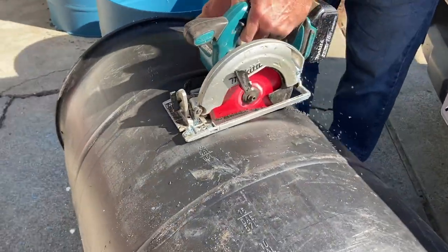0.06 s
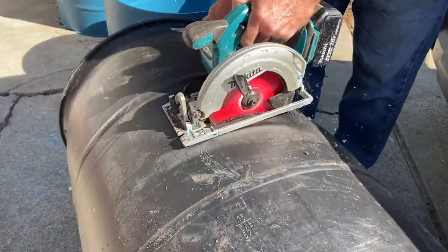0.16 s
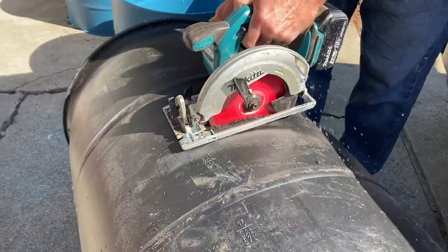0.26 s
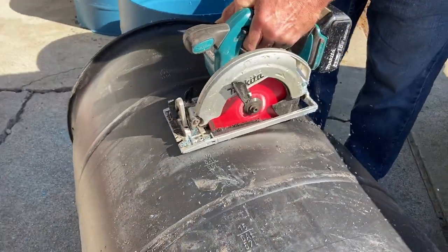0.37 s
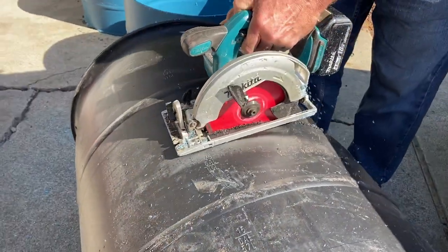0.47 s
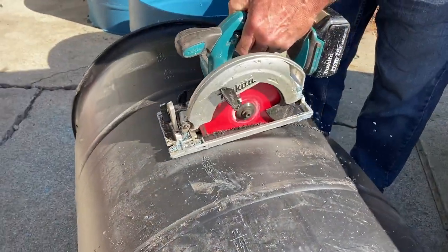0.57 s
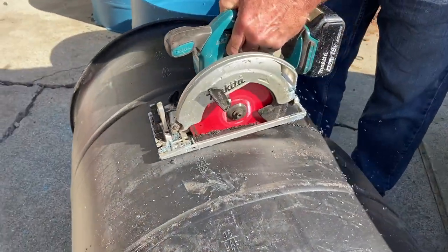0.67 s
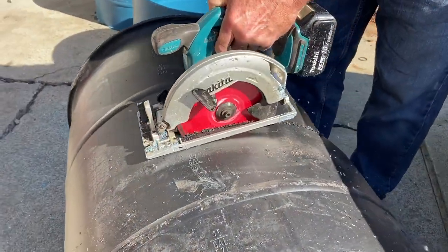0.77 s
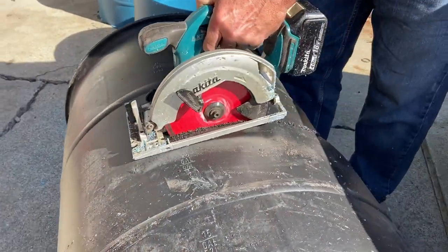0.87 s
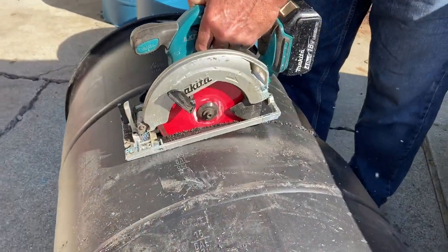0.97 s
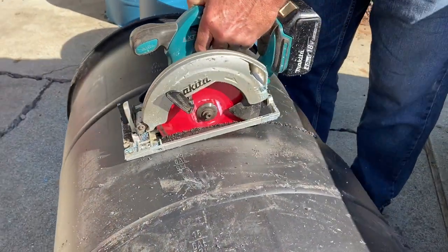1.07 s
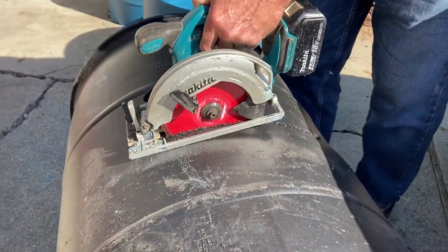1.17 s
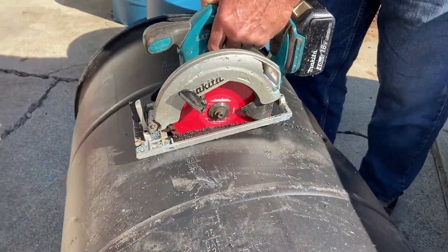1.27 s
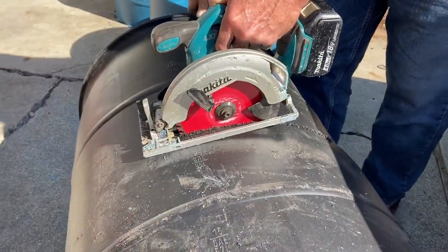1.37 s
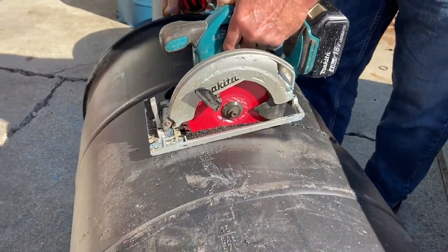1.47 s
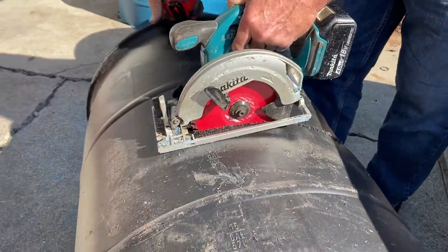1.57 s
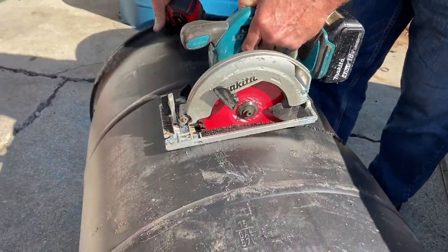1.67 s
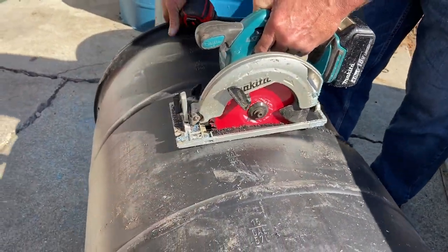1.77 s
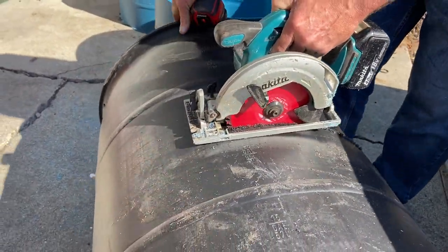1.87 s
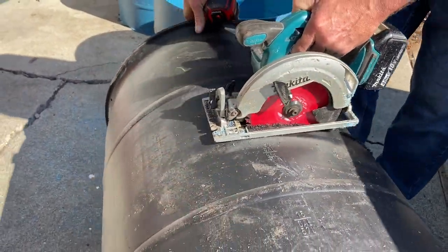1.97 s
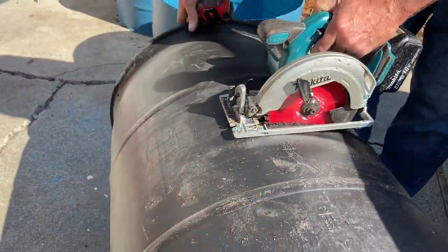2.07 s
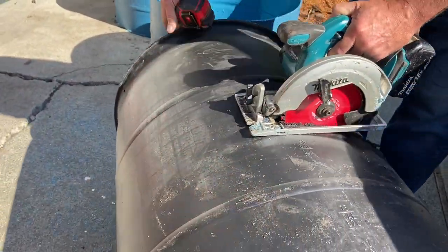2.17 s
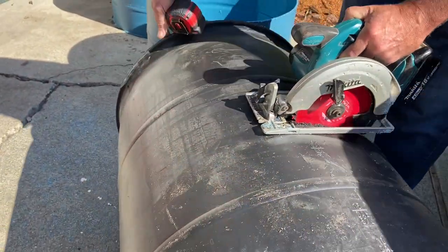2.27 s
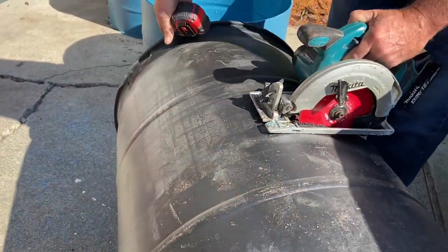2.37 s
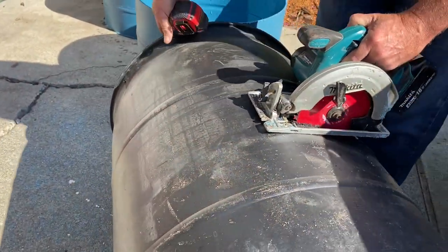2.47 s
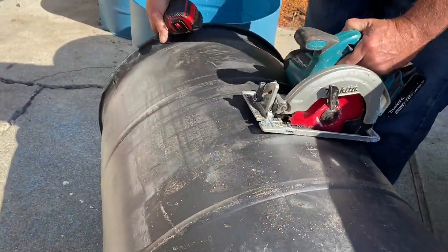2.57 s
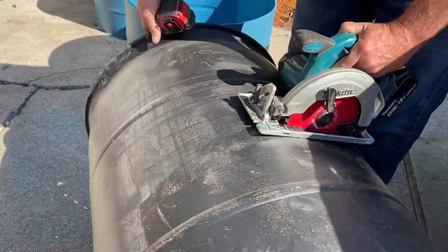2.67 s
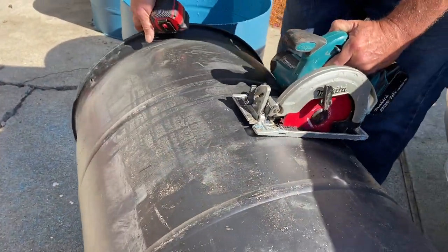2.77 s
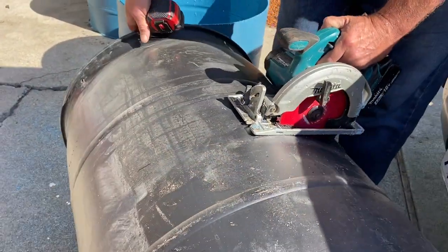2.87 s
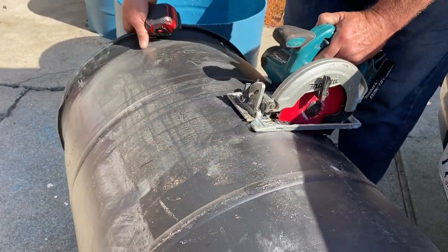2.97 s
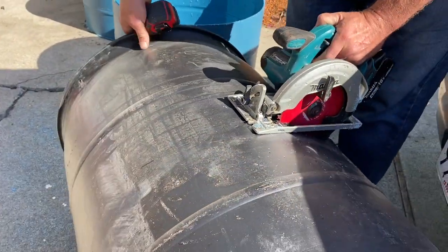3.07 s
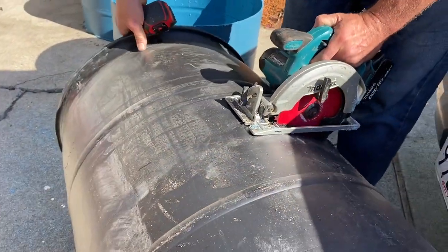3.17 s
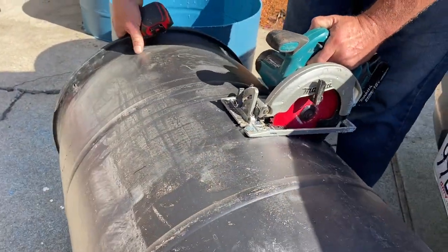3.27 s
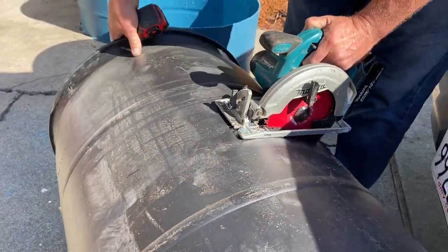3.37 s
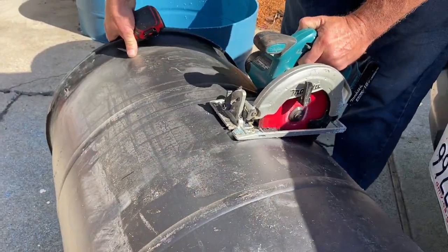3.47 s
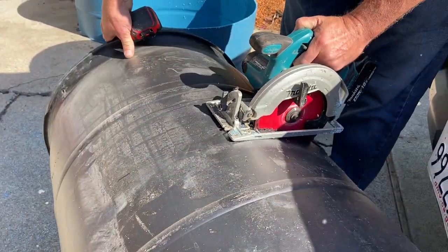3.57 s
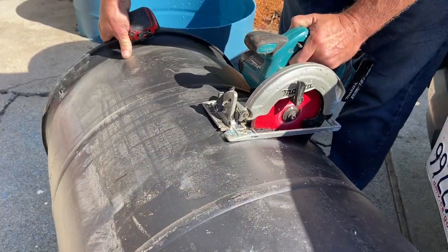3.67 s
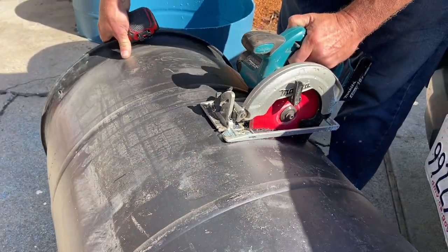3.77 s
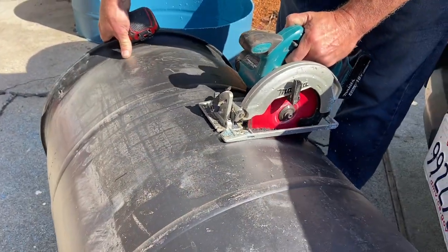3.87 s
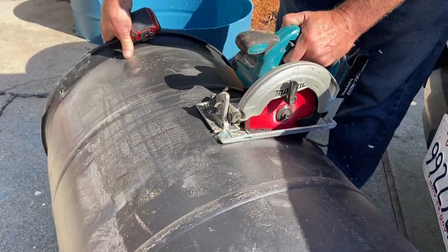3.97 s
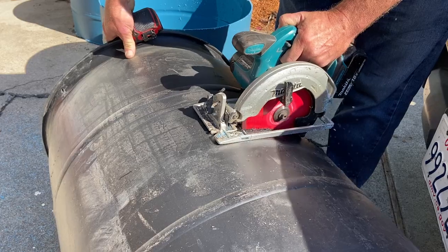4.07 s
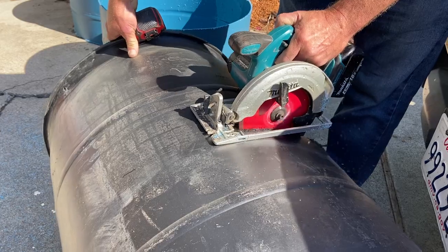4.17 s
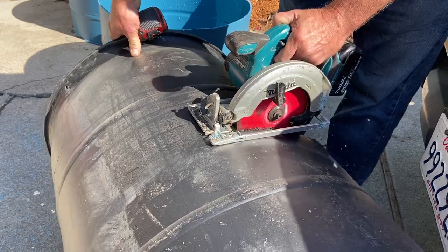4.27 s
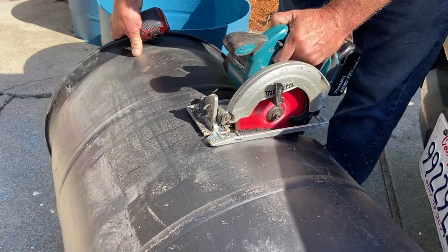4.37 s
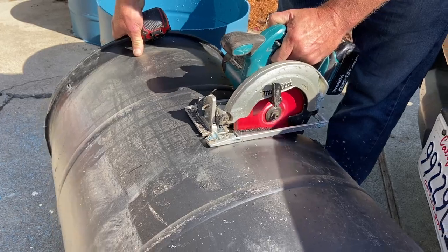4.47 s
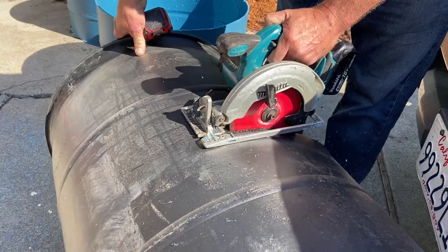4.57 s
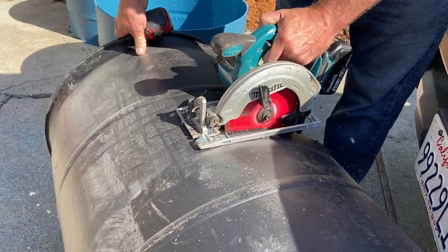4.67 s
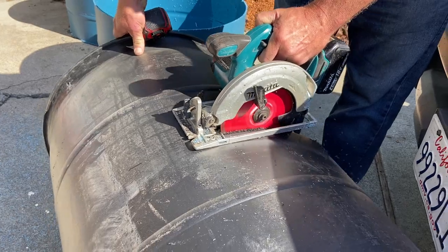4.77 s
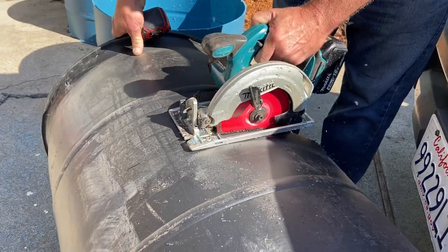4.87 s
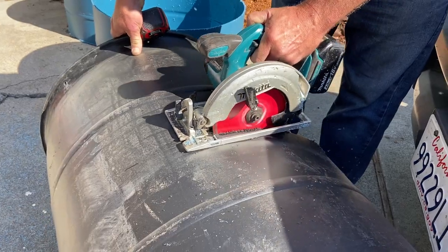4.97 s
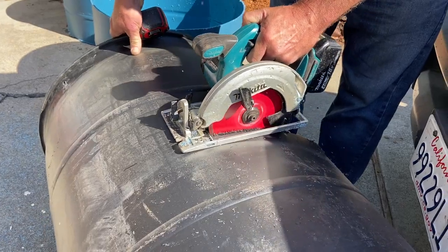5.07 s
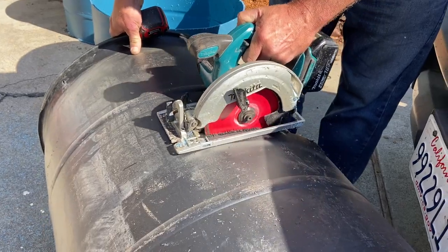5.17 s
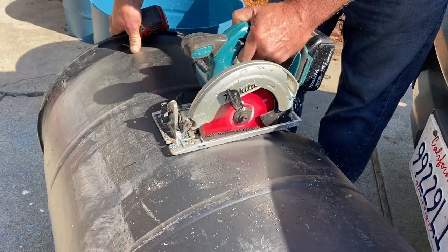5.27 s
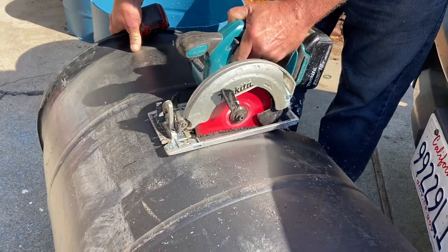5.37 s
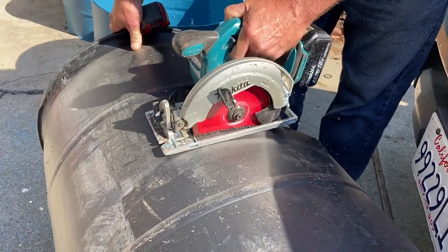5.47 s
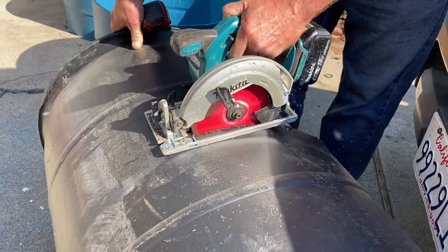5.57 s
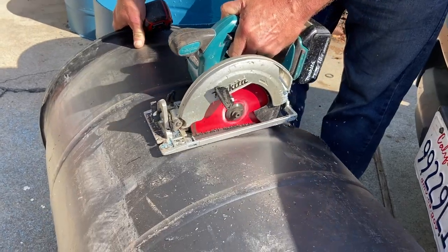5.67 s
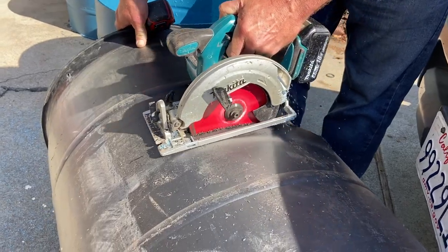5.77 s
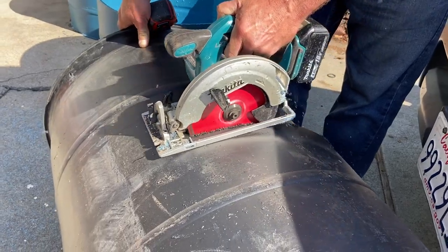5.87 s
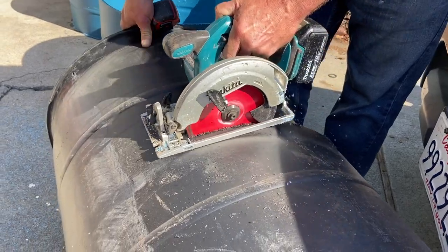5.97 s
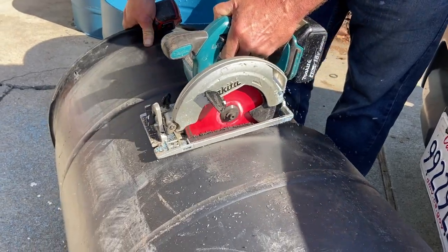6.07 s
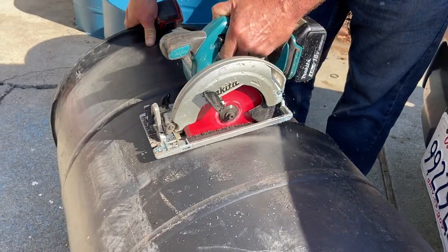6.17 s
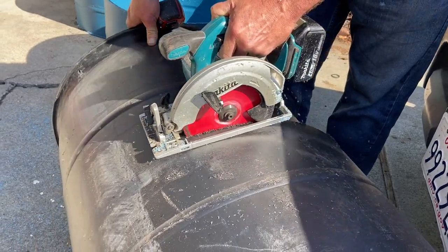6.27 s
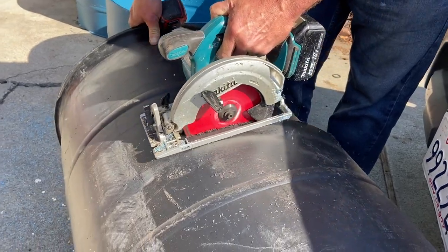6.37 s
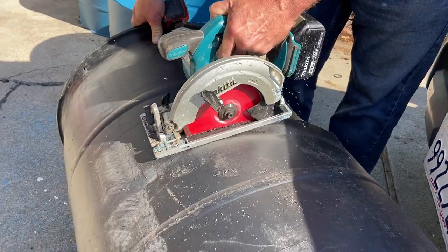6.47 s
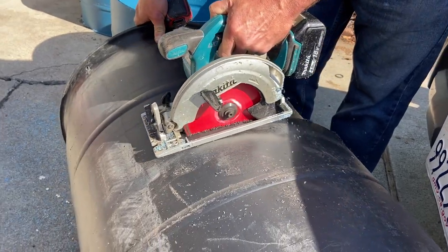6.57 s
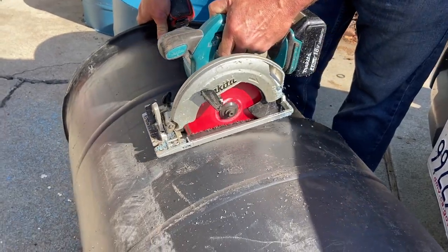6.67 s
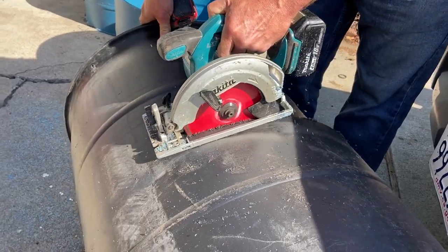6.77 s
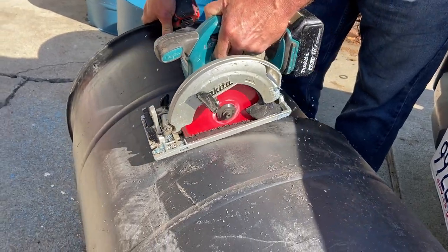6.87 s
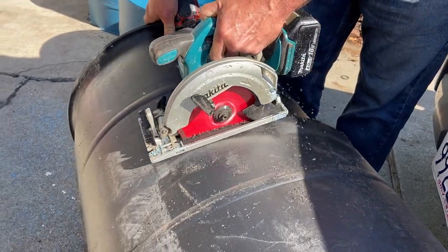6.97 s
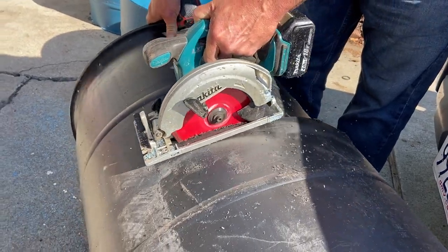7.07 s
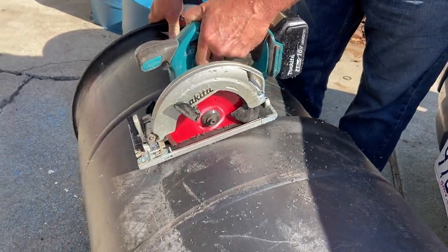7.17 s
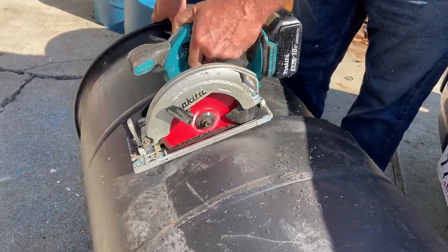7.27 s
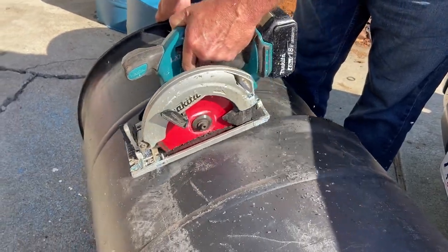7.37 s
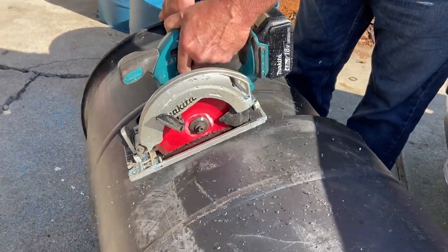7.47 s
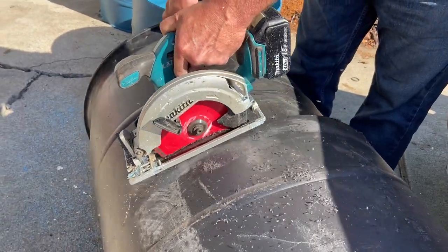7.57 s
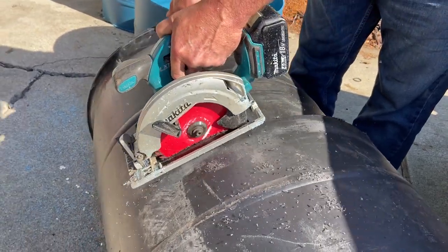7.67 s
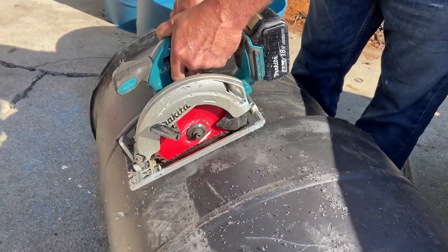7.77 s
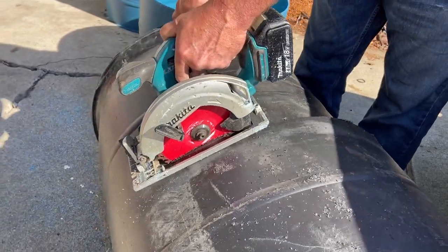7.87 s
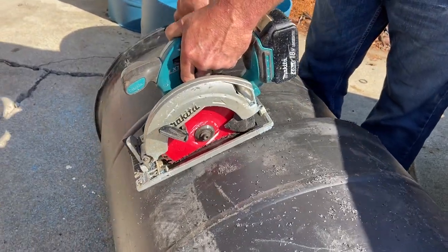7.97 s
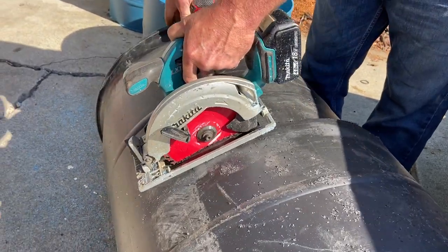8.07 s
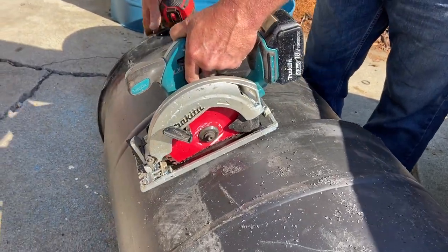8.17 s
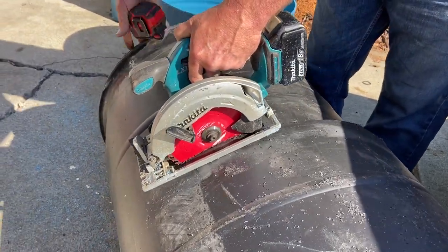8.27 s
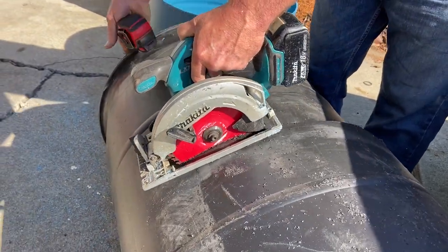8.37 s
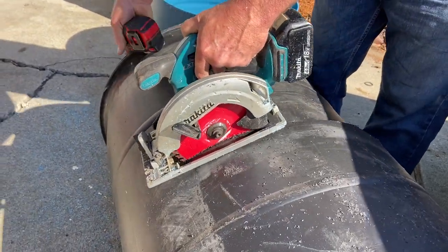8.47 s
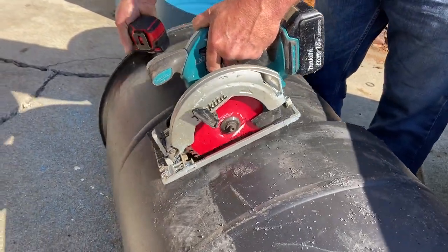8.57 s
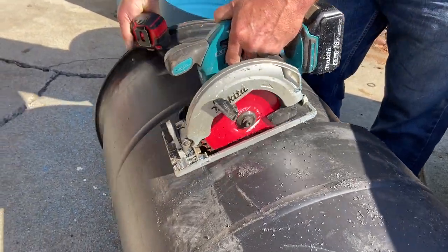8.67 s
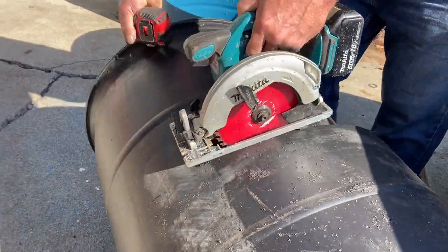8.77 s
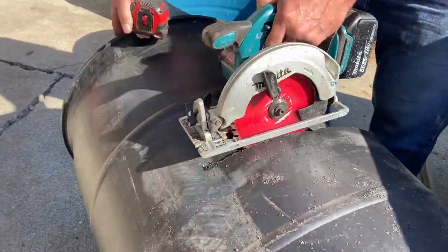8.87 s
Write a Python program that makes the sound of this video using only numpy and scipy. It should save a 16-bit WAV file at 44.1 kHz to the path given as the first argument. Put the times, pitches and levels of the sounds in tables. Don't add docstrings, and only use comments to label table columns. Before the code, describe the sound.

Loud gritty circular saw cutting into a plastic barrel, coasting to a stop, quiet handling, then a second longer cut that chatters to an abrupt stall.

```python
import sys
import numpy as np
from scipy import signal
from scipy.fft import rfft, irfft, next_fast_len
from scipy.io import wavfile

SR = 44100
rng = np.random.default_rng(int(sys.argv[2]) if len(sys.argv) > 2 else 0)


def materialize(psi):
    bounded = np.clip(np.atleast_2d(psi).T, -1, 1)
    quanta = np.round(bounded * 32767).astype(np.int16)
    wavfile.write(sys.argv[1], SR, quanta)


def linear_from_db(decibels):
    return 10 ** (np.asarray(decibels, float) / 20)


N = 393460
PADDED = next_fast_len(N + 4096)
TEETH = 40
FULL_SPEED_TEETH_PER_S = 1860
TRIGGER_S = 3.45


def rms_one(x):
    return x / np.sqrt(np.mean(x ** 2) + 1e-20)


def in_time(rows):
    s, *columns = np.transpose(rows)
    t = np.arange(N) / SR
    return [np.interp(t, s, c) for c in columns]


def coloured(x, points):
    hz, db = np.transpose(points)
    grid_hz = np.arange(PADDED // 2 + 1) * SR / PADDED + 1
    gain = linear_from_db(np.interp(np.log(grid_hz), np.log(hz), db))
    return irfft(rfft(x, PADDED) * gain, PADDED)[:N]


def drift(rate_hz):
    r = np.exp(-80 * np.pi * rate_hz / SR)
    noise = rng.standard_normal(N // 40 + 2002)
    slow = rms_one(signal.lfilter([1], [1, -2 * r, r * r], noise)[2000:])
    return np.interp(np.arange(N) / 40, np.arange(len(slow)), slow)


def resonance(x, hz, width_hz):
    r = np.exp(-np.pi * width_hz / SR)
    poles = [1, -2 * r * np.cos(2 * np.pi * hz / SR), r * r]
    return signal.lfilter([(1 - r * r) / 2, 0, (r * r - 1) / 2], poles, x)


def strike(times_s, peaks_db, modes, spread_db):
    at = (np.array(times_s) * SR).astype(int)
    out = np.zeros(N)
    chance = rng.standard_normal((len(at), len(modes)))
    for k, (hz, level_db, t60_s) in enumerate(modes):
        clicks = np.full(N, 1e-18)
        clicks[at] = linear_from_db(np.array(peaks_db) + level_db + spread_db * chance[:, k])
        r = linear_from_db(-60 / (t60_s * SR))
        w = 2 * np.pi * hz / SR
        out += signal.lfilter([0, np.sin(w)], [1, -2 * r * np.cos(w), r * r], clicks)
    return out


def grains(per_s, spread_db):
    sizes = linear_from_db(spread_db * np.minimum(rng.exponential(1, N), 5)) * rng.choice([-1, 1], N)
    return rms_one(sizes * (rng.random(N) < per_s / SR))


def held(starts_s, lengths_s, levels_db, rise_db_per_s, fall_db_per_s):
    t = np.arange(0, N + 32, 32) / SR
    early_s = (starts_s[:, None] - t).clip(0)
    late_s = (t - (starts_s + lengths_s)[:, None]).clip(0)
    db = np.max(levels_db[:, None] - rise_db_per_s * early_s - fall_db_per_s * late_s, axis=0)
    return linear_from_db(np.interp(np.arange(N) / SR, t, db))


def swells(rows, flutter_db, wander_rad):
    out = np.zeros(N)
    flutter = linear_from_db(flutter_db * drift(14))
    slip = wander_rad * drift(10)
    for s, length_s, hz, db in rows:
        span = np.arange(int((s - .04) * SR), int((s + length_s + .04) * SR))
        swell = np.sin(np.pi * (span - span[0]) / len(span))
        own = (span + rng.integers(N)) % N
        note = np.sin(2 * np.pi * hz * span / SR + slip[own])
        out[span.clip(0)] += linear_from_db(db) * swell * flutter[own] * note
    return out


# time in s, teeth passing per s.
SPEED = [
    [(0, 1854), (.25, 1870), (.55, 1898), (.66, 1897), (.706, 1779), (.842, 1290), (1.0, 840), (1.1, 615),
     (1.3, 330), (1.55, 90)],
    [(3.44, 90), (3.55, 700), (3.85, 1574), (4.09, 1650), (4.17, 1760), (4.45, 1764), (4.53, 1850),
     (4.72, 1850), (4.88, 1887), (5, 1888), (5.1, 1857), (5.3, 1860), (5.5, 1844), (5.75, 1852),
     (6.05, 1838), (6.2, 1870), (6.45, 1898), (6.85, 1815), (6.97, 1824), (7.12, 1812), (7.38, 1755),
     (7.41, 1662), (7.57, 1037), (7.65, 680), (7.72, 430), (7.79, 60)],
]
BOG_S, BOG_SINK_S, BOG_RECOVER_S, BOG_DEPTH_PER_S = 6.65, .19, .075, 530


def blade_speed():
    t = np.arange(N) / SR - BOG_S
    bog = np.where(t < 0, (1 + t / BOG_SINK_S).clip(0), np.exp(-t.clip(0) / BOG_RECOVER_S))
    return in_time(SPEED[0] + SPEED[1])[0] - BOG_DEPTH_PER_S * bog


def tooth_blows(passed, repeat_db, wobble_db):
    turn = passed / TEETH % 1
    order = np.arange(501)
    lean = 1 / (1 + order / 90) / (1 + (25 / (order + 1)) ** 2)
    size = np.sqrt(rng.exponential(1, (2, 501)))
    phase = np.exp(2j * np.pi * rng.random((2, 501)))
    signature = rms_one(irfft(lean * size * phase))
    place = (turn * 1000).astype(int)
    wear = 1.2 * drift(1.6)
    repeated = np.cos(wear) * signature[0, place] + np.sin(wear) * signature[1, place]
    runout = np.cos(2 * np.pi * turn) + .5 * np.cos(8 * np.pi * turn + 1) + .5 * np.cos(10 * np.pi * turn)
    chips = grains(7000, spread_db=0.5) * linear_from_db(wobble_db * runout + 1.7 * drift(29))
    share = linear_from_db(repeat_db)
    return (share * repeated + chips) / np.sqrt(1 + share ** 2)


def patchy(x, depth):
    centres_hz = np.geomspace(300, 11000, 9)
    return x + sum(depth * drift(2.3).clip(-2, 2) * resonance(x, hz, hz / 4) for hz in centres_hz)


# time in s, feed in dB, binding in the kerf in dB.
FIRST_CUT = [(0.0, -20.5, -7.5), (0.066, -21, -6.5), (0.12, -26.5, -3), (0.484, -22.5, -11.5),
             (0.838, -27.5, -1), (0.986, -33, 4), (1.03, -34, 3), (1.2, -42, 6), (1.37, -51, 10),
             (1.5, -77, 21)]
SECOND_CUT = [(3.51, -22.5, -8), (3.87, -18, -6.5), (4.87, -28.5, -5), (5.5, -20.5, -10), (5.73, -19, -10),
              (5.85, -21.5, -9.5), (6.12, -23, -12), (7.59, -26.5, -2.5), (7.66, -31, 2), (7.72, -37, 6.5)]
# time in s, width in s, feed change in dB, binding change in dB.
JOLTS = [(.25, .03, -1, -0.5), (.82, 0.055, 4.5, 0.5), (1.05, 0.034, 4, -2.5), (0.309, 0.048, 0, 4),
         (0.702, 0.017, 2, 0.5), (1.441, 0.032, 2, 2), (1.52, 0.017, 3.5, -2), (3.47, 0.023, 2.5, 20),
         (3.701, 0.049, -3.5, 1), (3.87, .02, 2.5, 0), (4.05, 0.045, 3, 0), (4.301, 0.041, 1.5, 4),
         (4.5, 0.12, 0.5, -4), (5.121, 0.056, -2, 2.5), (5.399, .06, 3, -0.5), (6.451, 0.026, 2.5, -0.5),
         (7.57, 0.013, -0.5, 6.5), (7.722, 0.024, -3.5, 8), (4.116, 0.013, -4, 3.5), (4.731, .03, -2, 3),
         (6.22, .03, 2, 1), (6.6, .03, -3.5, 2.5), (7.16, .03, -4.5, 3.5), (7.36, .03, 1, 3.5),
         (7.461, 0.021, -2, 1), (7.64, 0.016, 1.5, 1)]
SPIN_UP_DB_PER_S, STOP_DB_PER_S = 601.5, 207.5
ECHO_DB, ECHO_DB_PER_S = -18, 100


def effort():
    t = np.arange(N) / SR
    first, second = in_time(FIRST_CUT), in_time(SECOND_CUT)
    feed_db, bind_db = np.where(t < TRIGGER_S, first, second)
    after_s = (t - np.where(t < TRIGGER_S, FIRST_CUT[-1][0], SECOND_CUT[-1][0])).clip(0)
    feed_db += np.maximum(-STOP_DB_PER_S * after_s, ECHO_DB - ECHO_DB_PER_S * after_s)
    feed_db -= SPIN_UP_DB_PER_S * (SECOND_CUT[0][0] - t).clip(0) * (t >= TRIGGER_S)
    for s, width_s, jump_db, snag_db in JOLTS:
        bump = np.exp(-.5 * ((t - s) / width_s) ** 2)
        feed_db = feed_db + jump_db * bump
        bind_db = bind_db + snag_db * bump
    return feed_db, bind_db


STRONG_TURNS = [20, 26, 29, 32, 42, 43, 46, 49, 58, 61, 65, 68, 69, 70, 71, 74, 77, 79, 80, 82, 87, 90, 92,
                104, 136, 140, 145]
STRONG_DB = [-19.5, -22.5, -24, -23.5, -19.5, -15.5, -23.5, -25.5, -23, -24.5, -29, -22, -21.5, -17.5, -20,
             -20.5, -21, -23, -18, -27.5, -26.5, -24.5, -26.5, -23, -22, -23, -17]


def strong_turns(passed, level_db):
    turns = 2 * np.pi * passed / TEETH
    lines = np.zeros(N)
    for k, db in zip(STRONG_TURNS, STRONG_DB):
        lines += linear_from_db(db + 3.3 * drift(2.6)) * np.sin(k * turns + 2 * np.pi * rng.random())
    return linear_from_db(level_db) * lines


# start in s, length in s, level in dB.
WHINES = [(0, 0.076, -27), (.1, .6, -33.5), (0.77, 0.3, -26), (4.036, 0.059, -27.5), (4.177, 0.034, -24),
          (4.532, 0.14, -29), (4.7, 0.61, -37.5), (5.136, 0.43, -32.5), (5.75, 0.097, -43),
          (5.944, .12, -34), (6.5, 0.28, -36), (6.932, 0.12, -30.5), (7.21, .12, -38), (7.43, 0.086, -32.5),
          (7.605, 0.049, -30.5), (7.692, 0.054, -24.5)]
WHINE_RISE_DB_PER_S, WHINE_FALL_DB_PER_S = 156, 198.5
OVERTONE_TEETH_PER_S, FAINT_TEETH_PER_S = 450, 300
CHATTER_DB_PER_OCTAVE, CHATTER_RAD_PER_OCTAVE = 2.0, 1.3


def tooth_whine(per_s, passed, slowed_oct):
    stalling = slowed_oct.clip(0, 2) * (np.arange(N) / SR > TRIGGER_S)
    phase = 2 * np.pi * passed + .55 * drift(20) + CHATTER_RAD_PER_OCTAVE * stalling * drift(45)
    apart = np.exp(-per_s / OVERTONE_TEETH_PER_S) * (stalling > 0)
    tone = np.sin(phase) + (0.065 + 2 * apart) * np.sin(2 * phase) + 2 * apart ** 2 * np.sin(3 * phase)
    tone = tone / (1 + (FAINT_TEETH_PER_S / per_s) ** 3)
    tone = tone * (1 + 0.17 * np.cos(2 * np.pi * passed / TEETH))
    level = held(*np.transpose(WHINES), WHINE_RISE_DB_PER_S, WHINE_FALL_DB_PER_S)
    return level * linear_from_db(1.1 * drift(27) + CHATTER_DB_PER_OCTAVE * stalling * drift(28)) * tone


# frequency in Hz, level in dB per Hz.
CUT_COLOUR = [(40, -29), (150, -18.5), (330, -10), (600, -4), (1350, 1.5), (2400, -3), (3500, -0.5),
              (5300, -10), (6800, -4), (7800, -5.5), (10000, -6.5), (13500, -6), (15500, -3)]
# frequency in Hz, width in Hz, level in dB.
BLADE = [(233, 22, -12), (627, 4.3, -2), (1312, 24, -6.5), (1840, 3.7, -11), (2760, 3.7, -11.5),
         (3030, 3.7, -3.5), (3320, 90, -7.5), (3390, 22, -5), (3650, 21, -6), (4315, 38, 1),
         (6700, 56, -9.5), (6840, 74, 0)]
# time in s, repeated over loose part in dB.
EVENNESS = [(0, 1), (.3, 2), (.42, 5), (.66, 5), (.72, -7), (4.4, -7), (4.52, -1), (5.1, -1), (5.6, 1),
            (6.1, 1), (6.25, -4), (6.5, -8), (6.8, -8), (6.9, -1), (7.35, -2), (7.45, -8)]
# start in s, length in s, frequency in Hz, level in dB.
SINGS = [(0, .38, 423, -36), (0, .3, 931, -33), (.19, .3, 1134, -37.5), (7.25, .23, 380, -39.5),
         (.78, .15, 687, -36.5), (3.84, .3, 1384, -37), (3.85, .2, 1968, -33), (3.7, .58, 3690, -31),
         (4.1, .3, 1140, -33), (6.75, .8, 3130, -40), (4.65, .5, 410, -44), (4.63, .25, 560, -37.5),
         (4.93, .26, 514.3, -35), (5.56, .41, 695, -38), (6.88, .22, 2229, -40)]
BOOM_DB, BOOM_DB_PER_BIND_DB, BOOM_DB_PER_OCTAVE = -7.5, 0.92, 2.5
FLUTTER_DB_PER_OCTAVE = .8
TOP_DULL_DB_PER_S = 148


def saw():
    per_s = blade_speed()
    passed = np.cumsum(per_s) / SR
    slowed_oct = np.log2(FULL_SPEED_TEETH_PER_S / per_s)
    repeat_db, = in_time(EVENNESS)
    repeat_db = repeat_db - 12 * slowed_oct.clip(0, 2)
    blows = tooth_blows(passed, repeat_db - 3, wobble_db=0.5)
    plate = np.zeros(N)
    for k, (hz, width_hz, db) in enumerate(BLADE):
        plate += (-1) ** k * linear_from_db(db) * (1 + 0.36 * drift(2.0)) * resonance(blows, hz, width_hz)
    body = patchy(coloured(blows + linear_from_db(8.0) * plate, CUT_COLOUR), depth=0.18)

    low = signal.sosfiltfilt(signal.butter(2, 800, fs=SR, output="sos"), body)
    high = signal.sosfiltfilt(signal.butter(2, 2600, "high", fs=SR, output="sos"), body)
    top = signal.sosfiltfilt(signal.butter(2, 7500, "high", fs=SR, output="sos"), high)
    stopped_s = (np.arange(N) / SR - SECOND_CUT[-1][0]).clip(0)
    fading = (high - top * (1 - linear_from_db(-TOP_DULL_DB_PER_S * stopped_s))) / np.std(high)

    feed_db, bind_db = effort()
    bind_db = bind_db + FLUTTER_DB_PER_OCTAVE * slowed_oct.clip(0, 2) * drift(25)
    boom_db = feed_db + BOOM_DB + BOOM_DB_PER_BIND_DB * bind_db + BOOM_DB_PER_OCTAVE * slowed_oct
    boom = linear_from_db(boom_db - 1.5) * rms_one(low)
    bite = linear_from_db(feed_db + bind_db - 7.0) * rms_one(body - low - high)
    hiss = linear_from_db(feed_db + 2.5) * fading
    cut = boom + bite + hiss + strong_turns(passed, feed_db + repeat_db)
    singing = linear_from_db(1.2) * swells(SINGS, flutter_db=3.5, wander_rad=0.98)
    return cut + tooth_whine(per_s, passed, slowed_oct) + singing


# start in s, length in s, dull rub in dB, scrape in dB.
RUBS = [(1.55, 0.011, -62.5, -69), (1.65, .12, -76.5, -79.5), (1.944, .06, -76, -62),
        (2.091, 0.036, -53, -65), (2.2, 0.18, -68, -94), (2.55, 0.37, -55, -77), (3.001, 0.12, -49, -85.5),
        (3.284, .05, -60.5, -79), (3.43, 0.011, -82.5, -88.5), (7.94, .14, -84.5, -77.5),
        (8.199, .3, -86.5, -95.5), (8.598, .03, -55, -89), (8.679, .1, -56.5, -77),
        (8.842, 0.078, -46, -72)]
# frequency in Hz, level in dB per Hz.
RUB_COLOUR = [(90, -36.5), (130, 0), (220, 6), (400, 2.5), (750, -1.5), (1200, -13.5), (2500, -36.5),
              (5000, -43.5)]
# frequency in Hz, level in dB per Hz.
SCRAPE_COLOUR = [(800, 3), (1500, 2), (2200, -3), (3400, -8.5), (5000, -12.5), (8000, -18), (15500, -22)]
# start in s, length in s, level in dB.
THUMP = [(0, 1.1, -62.5), (1.353, 0.18, -53.5), (1.77, .13, -70), (2.086, .03, -54.5), (2.42, 0.044, -57.5),
         (2.548, .35, -59.5), (2.987, 0.096, -49), (3.112, 0.032, -54.5), (3.194, 0.18, -62.5),
         (3.481, 0.037, -34.5), (3.827, .7, -59), (4.586, .6, -52), (5.195, 1.3, -59), (6.903, .6, -60),
         (7.75, .05, -41), (8.05, 0.44, -79), (8.57, .35, -59)]
# frequency in Hz, level in dB per Hz.
THUMP_COLOUR = [(25, -60.5), (45, -23.5), (64, 3.5), (72, -8), (84, 5.5), (95, -11), (112, -10.5),
                (150, -8), (250, -54.5)]
# start in s, length in s, frequency in Hz, width in Hz, level in dB.
SQUEAKS = [(3.7, .074, 2550, 302, -71), (1.94, 0.033, 2250, 270, -56), (1.95, .04, 3330, 320, -56)]
RUB_RISE_DB_PER_S, SCRAPE_RISE_DB_PER_S, RUB_FALL_DB_PER_S = 400, 160.5, 204
THUMP_RISE_DB_PER_S, THUMP_FALL_DB_PER_S = 1200, 110.5


def handling():
    s, length_s, rub_db, scrape_db = np.transpose(RUBS)
    rub = held(s, length_s, rub_db, RUB_RISE_DB_PER_S, RUB_FALL_DB_PER_S)
    scrape = held(s, length_s, scrape_db, SCRAPE_RISE_DB_PER_S, RUB_FALL_DB_PER_S)
    dull = rms_one(coloured(grains(2500, spread_db=2.0), RUB_COLOUR)) * linear_from_db(1.0 * drift(39) - 8.0)
    fine = rms_one(coloured(grains(8000, spread_db=1.5), SCRAPE_COLOUR)) * linear_from_db(2.5 * drift(35))
    rattle = np.zeros(N)
    for start_s, long_s, hz, width_hz, db in SQUEAKS:
        event = np.array([[start_s], [long_s], [db]])
        rattle += held(*event, RUB_RISE_DB_PER_S, RUB_FALL_DB_PER_S) * resonance(fine, hz, width_hz)
    rocking = held(*np.transpose(THUMP), THUMP_RISE_DB_PER_S, THUMP_FALL_DB_PER_S)
    thump = rocking * rms_one(coloured(rng.standard_normal(N), THUMP_COLOUR))
    return rattle + rub * dull + scrape * fine + thump


# frequency in Hz, level in dB per Hz.
AIR = [(60, 11), (250, -9), (1000, -21.5), (4000, -34), (15000, -37)]
AIR_DB = -67


def air():
    return linear_from_db(AIR_DB) * rms_one(coloured(rng.standard_normal(N), AIR))


# time in s, peak in dB.
RINGS = [
    (1.5, -57),
    (2.15, -83),
    (7.79, -50),
]
# frequency in Hz, level in dB, t60 in s.
COAST_RING = [(215, -6, 1.2), (754, -18, .8), (1470, -11, .8), (2358, -19, 1.0), (3526, -11, 1.0)]
# frequency in Hz, level in dB, t60 in s.
NUDGE_RING = [(2358, -1.5, 0.76), (3540, -1, 0.97), (3800, -13, .4)]
# frequency in Hz, level in dB, t60 in s.
STALL_RING = [(215, 1, 1.3), (431, 2, .15), (651, -2, .26), (867, 0, .6), (1082, -14, .42), (1233, -4, .5),
              (1346, -21, .78), (1787, -26, .88), (2159, -21, .55), (2315, -16, .85)]


def rings():
    mode_sets = (COAST_RING, NUDGE_RING, STALL_RING)
    return sum(strike([s], [db], modes, spread_db=5.0) for (s, db), modes in zip(RINGS, mode_sets))


# time in s, peak in dB,
# brightness in dB, note of the spot in Hz.
KNOCKS = [(1.852, -73.5, -12, 990), (2.017, -43, -18, 620), (2.078, -49, -16.5, 607),
          (2.082, -44, -24.5, 160), (2.103, -45.5, -12.5, 660), (2.133, -52, -9, 900),
          (2.146, -52, -14, 700), (2.119, -48.5, -18.5, 710), (2.202, -58.5, -22, 750),
          (2.467, -67.5, -16, 476), (2.548, -52.5, -9, 670), (2.61, -51.5, -15.5, 487),
          (2.749, -62.5, -27, 565), (2.794, -50, -21.5, 377), (2.829, -54.5, -8, 710),
          (2.873, -54, -22, 369), (2.998, -47.5, -19.5, 646), (3.036, -39, -21, 670),
          (3.089, -39, -27, 300), (3.33, -57.5, -6, 1100), (3.45, -47, -5.5, 520),
          (3.456, -17.5, -20.5, 720), (7.571, -20.5, -24.5, 945), (7.606, -19, -24.5, 820),
          (7.636, -9, -24, 690), (7.669, -17, -23.5, 620), (7.688, -21.5, -23, 880),
          (7.716, -15, -24.5, 680), (8.097, -55.5, -34, 608), (8.103, -64, -35, 1050),
          (8.114, -58, -35, 700), (8.526, -62.5, -6.5, 1520), (8.609, -54.5, -14, 1272),
          (8.751, -57.5, -24, 638), (8.837, -53, -22.5, 315), (8.865, -45.5, -13.5, 510),
          (8.912, -57.5, -4.5, 612)]
# frequency in Hz, level in dB, t60 in s.
DRUM = [(107, -13.5, 0.1), (203.3, 2, 0.35), (338.4, 3.5, 0.078), (373, -7.5, 0.18)]


def knocks():
    s, peak_db, bright_db, note_hz = np.transpose(KNOCKS)
    at = (s * SR).astype(int)
    ticks = np.full(N, 1e-18)
    ticks[at] = linear_from_db(peak_db + bright_db + 4.0)
    fade = np.exp(-1 / (.004 * SR))
    grit = rms_one(coloured(rng.standard_normal(N), SCRAPE_COLOUR))
    out = signal.lfilter([1], [1, -fade], ticks) * grit
    t = np.arange(4000) / SR
    for start, db, hz in zip(at, peak_db, note_hz):
        pair = np.sin(2 * np.pi * hz * t) + 0.16 * np.sin(2 * np.pi * 0.92 * hz * t)
        note = linear_from_db(db - 3.0) * np.exp(-t / 0.0094) * (1 - np.exp(-t / 0.0011)) * pair
        out[start:start + 4000] += note[:N - start]
    return out + strike(s, np.minimum(peak_db, -30) - 17.5, DRUM, spread_db=3.0)


# start in s, length in s, frequency in Hz, level in dB.
CHIRPS = [(1.88, .06, 4700, -79), (2.43, .05, 4700, -83)]


def bird():
    return swells(CHIRPS, flutter_db=1.5, wander_rad=.3)


# frequency in Hz, unlike part in the two ports in dB.
SCATTER = [(60, -27), (500, -10), (2200, -7), (3800, -11.5), (5500, -4.5), (7000, -8.5), (8000, -13),
           (9000, -18.5), (10200, -4.5), (11200, -19), (12300, -11), (13400, -19.5), (14400, -10.5),
           (15300, -27)]
# frequency in Hz, left lead in radians.
PORT_TURN = [(0, 0), (1800, .4), (4000, .3), (7300, 0), (8800, -3.0), (9300, -3.3), (10900, -6.2),
             (11500, -6.35), (13100, -9.3), (13700, -9.55), (15200, -12.57)]


def ports(x):
    echo = rng.standard_normal(4000) * np.exp(-np.arange(4000) / (.028 * SR))
    side = coloured(signal.fftconvolve(x, echo / np.linalg.norm(echo))[:N], SCATTER)
    grid_hz = np.arange(PADDED // 2 + 1) * SR / PADDED
    turn_rad = np.interp(grid_hz, *np.transpose(PORT_TURN)) / 2
    left = rfft(x + side, PADDED) * np.exp(1j * turn_rad)
    right = rfft(x - side, PADDED) * np.exp(-1j * turn_rad)
    return linear_from_db([[.3], [-.3]]) * irfft([left, right], PADDED)[:, :N]


def scene():
    return ports(saw() + handling() + air() + rings() + knocks() + bird())


def roll_off(x):
    return signal.sosfilt(signal.butter(12, 15730, fs=SR, output="sos"), x)


def record(dry):
    mix = signal.sosfilt(signal.butter(2, 38, "high", fs=SR, output="sos"), dry)
    return roll_off(mix)


dry = scene()
out = record(dry)
materialize(out)
```